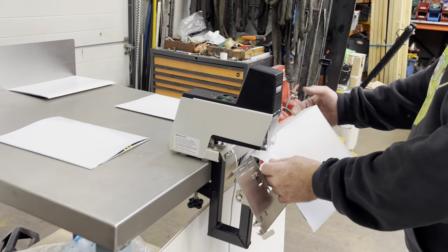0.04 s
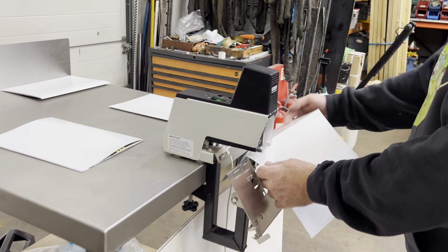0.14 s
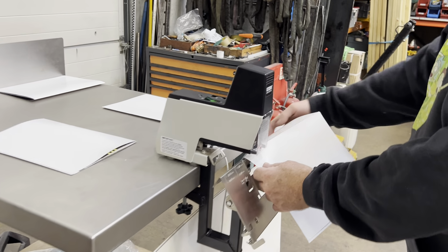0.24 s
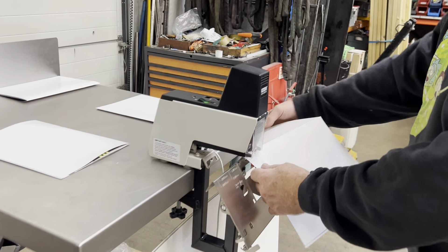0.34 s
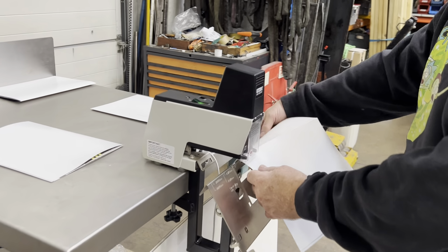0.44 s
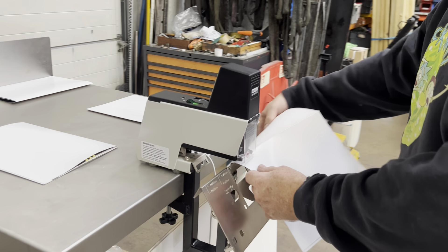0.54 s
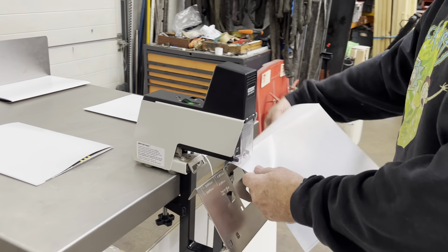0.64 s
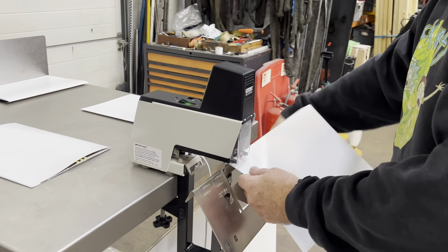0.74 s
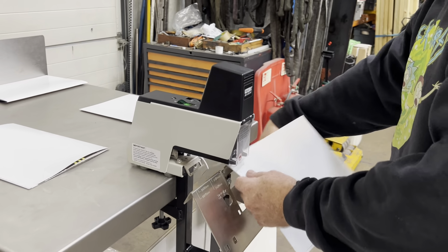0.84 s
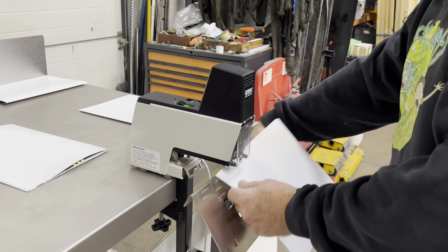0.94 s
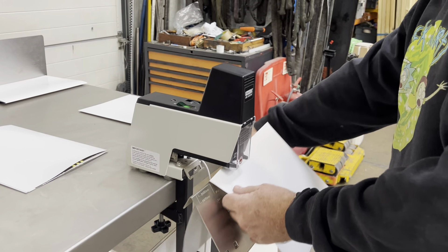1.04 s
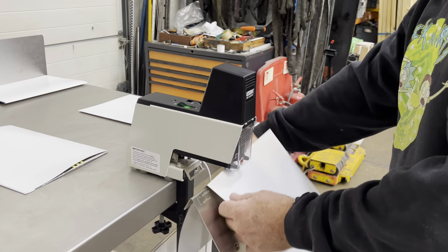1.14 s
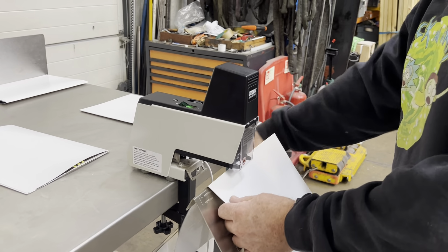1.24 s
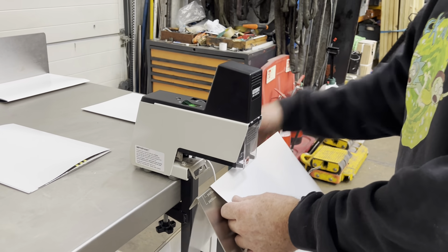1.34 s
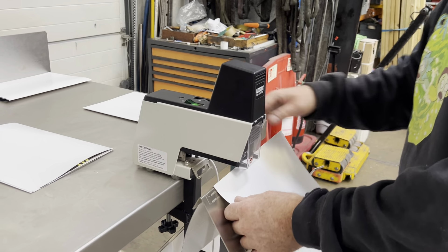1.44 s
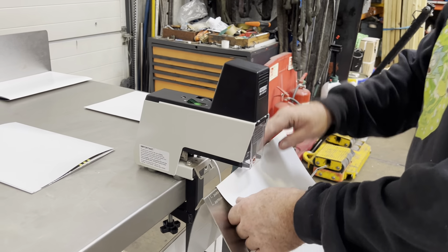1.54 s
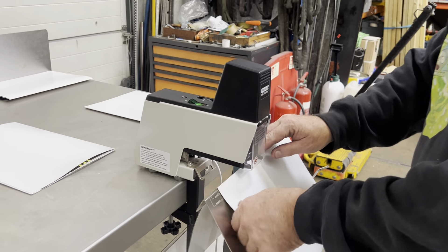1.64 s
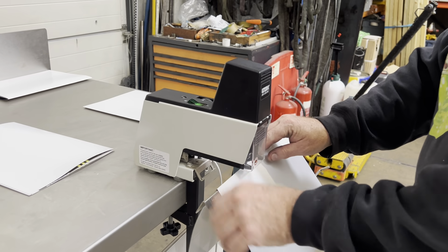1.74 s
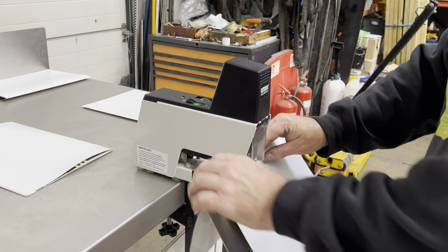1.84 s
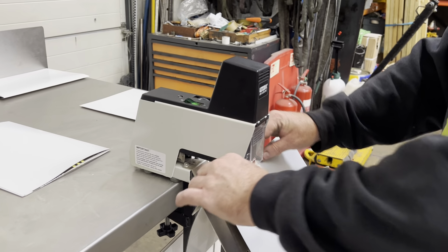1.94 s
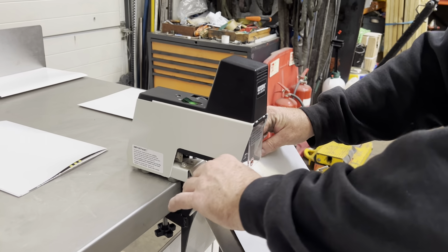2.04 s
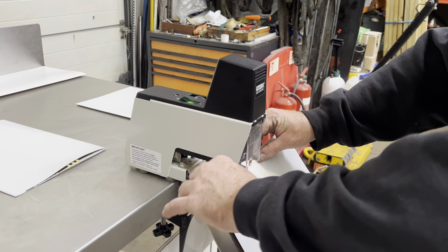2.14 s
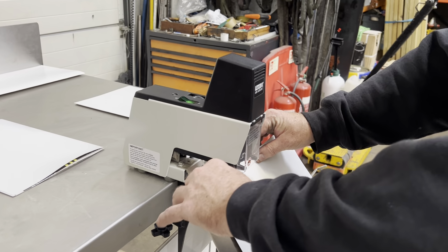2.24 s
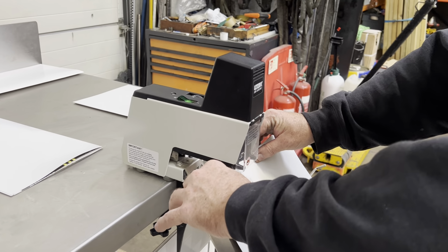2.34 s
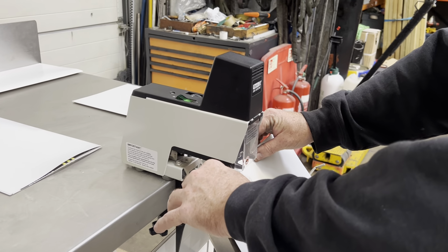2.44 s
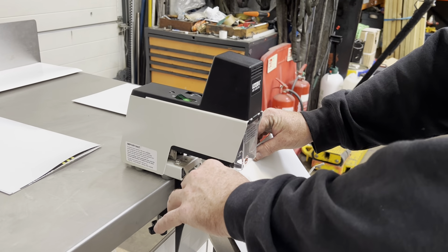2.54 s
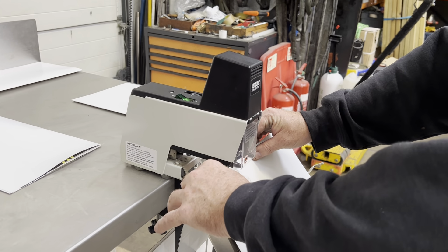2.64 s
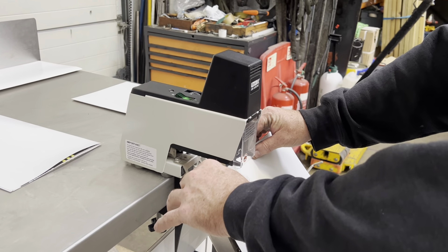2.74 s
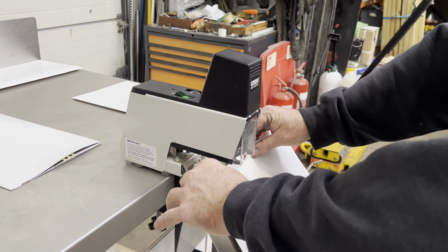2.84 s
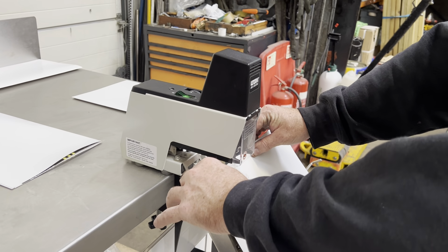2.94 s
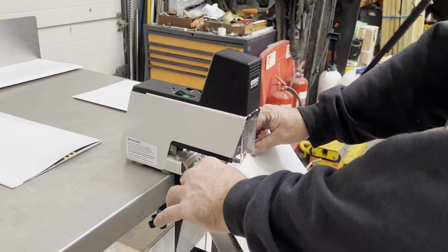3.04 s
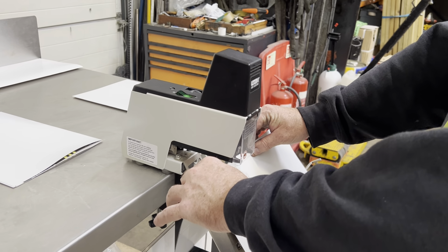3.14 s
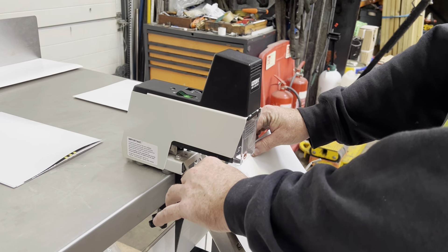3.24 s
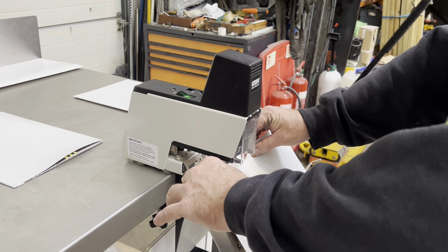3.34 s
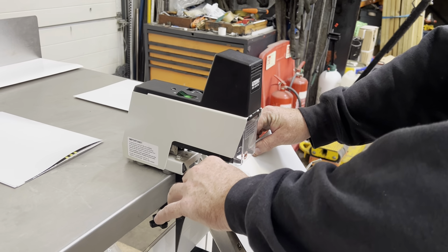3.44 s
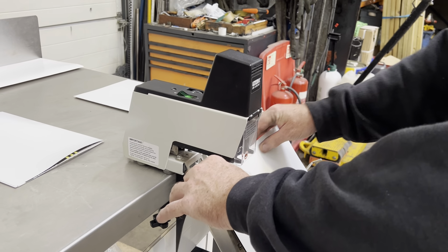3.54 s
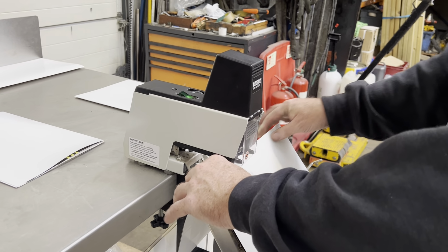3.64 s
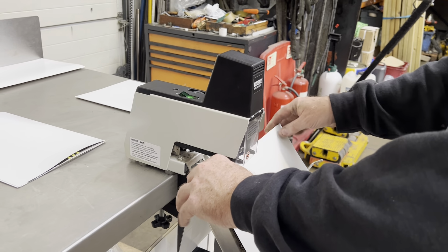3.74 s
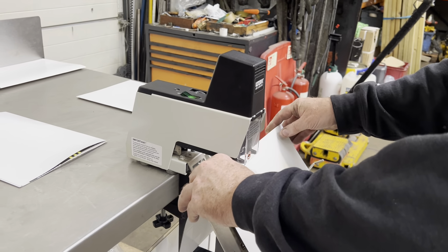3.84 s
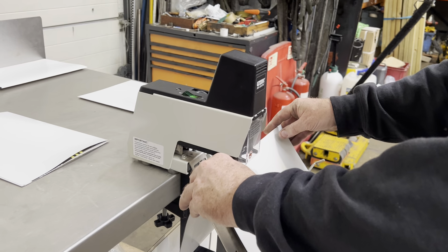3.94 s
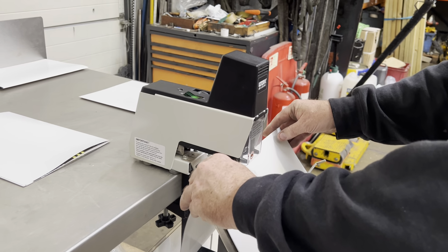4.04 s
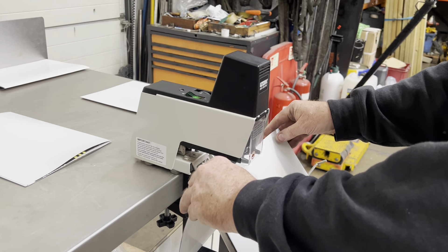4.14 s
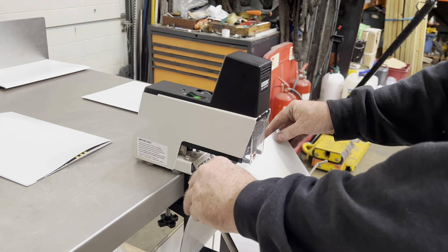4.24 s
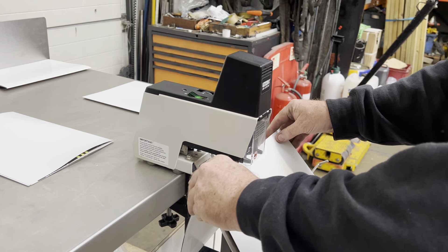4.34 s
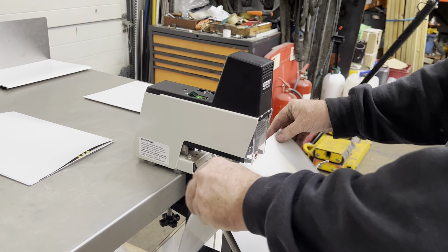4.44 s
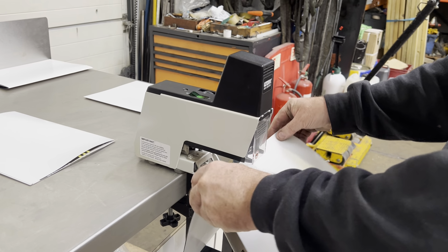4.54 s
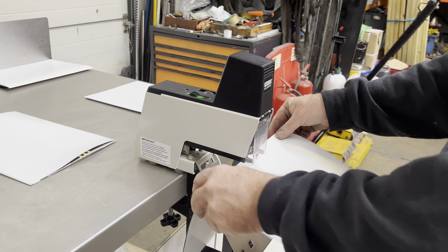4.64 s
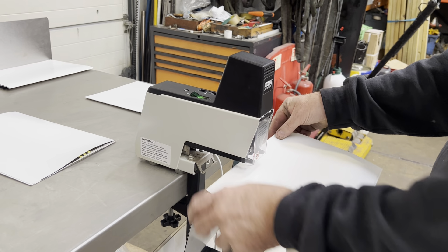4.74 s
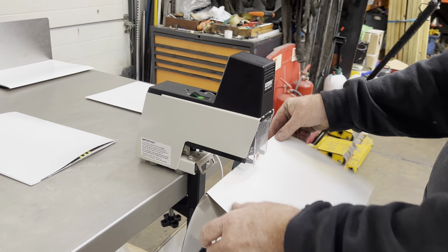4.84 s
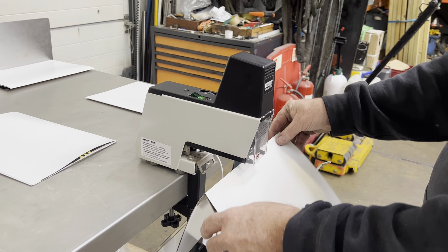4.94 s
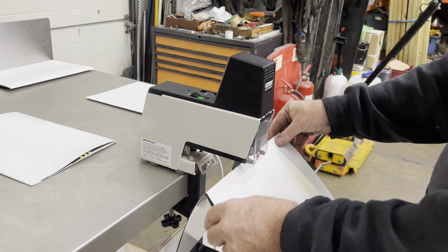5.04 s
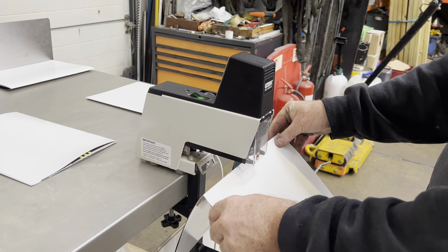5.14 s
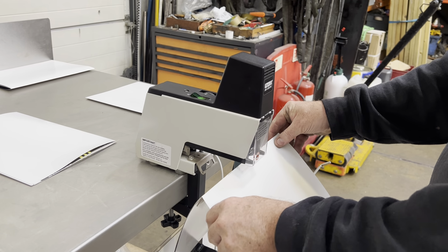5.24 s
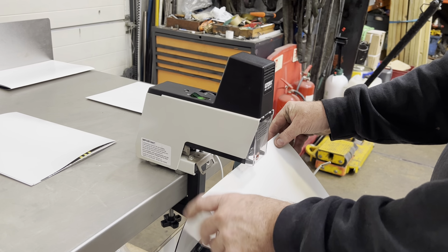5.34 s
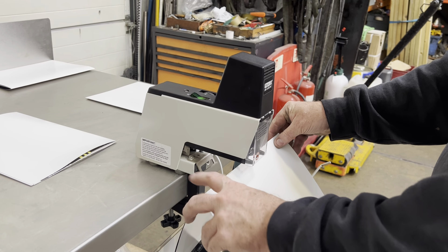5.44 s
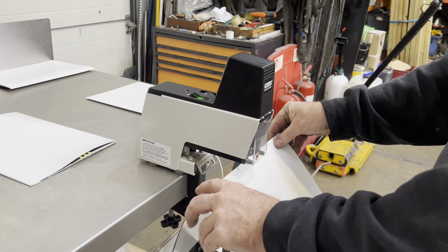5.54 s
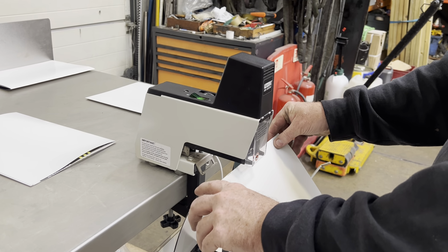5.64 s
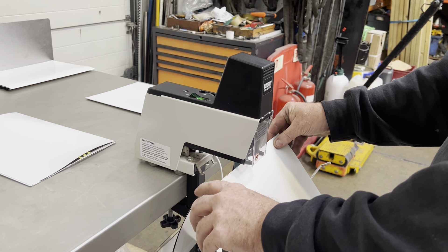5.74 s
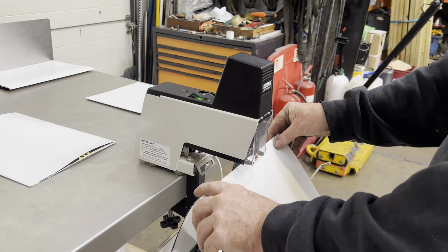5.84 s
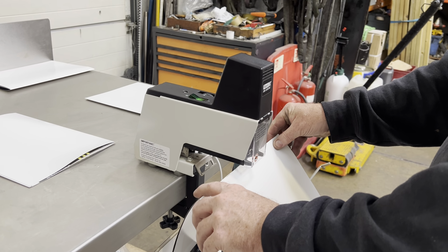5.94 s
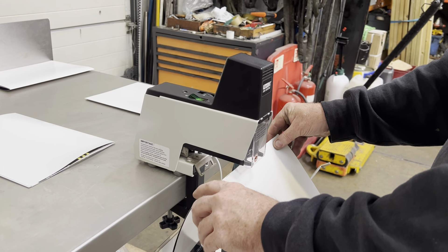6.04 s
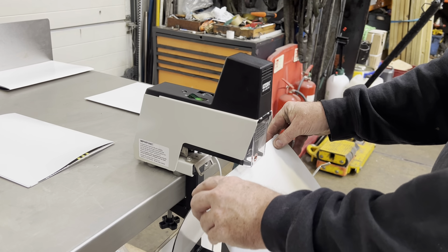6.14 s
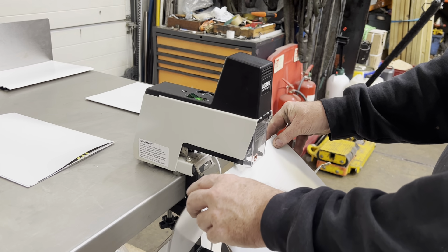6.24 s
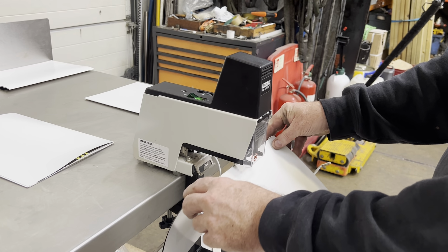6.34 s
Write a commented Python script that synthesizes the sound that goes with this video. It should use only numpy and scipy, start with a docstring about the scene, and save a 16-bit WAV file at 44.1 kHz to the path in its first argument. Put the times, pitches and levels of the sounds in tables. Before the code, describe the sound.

In an echoing workshop with faint ventilation, paper rustles and buckles, a pedal clicks, and two sharp stapler bangs fire about 2.7 seconds apart.

```python
"""Throughout, the rumble and whirr of distant ventilation, as filtered noise, fill a large hard-walled workshop.
From the start, hands shift stiff paper on a saddle: clicking noise hisses in slides, snaps and flops.
A pedal clicks as a crack and a hollow note; then an electric stapler clamped to a steel bench fires, twice in all.
In each stroke the magnet throws the driver, the staple shears and clinches, and parts rattle: sprays of contacts.
Resonant modes ring the head and bench, noise tails give the echo, and a phone a metre away picks it all up."""
import sys
import numpy as np
from scipy import signal
from scipy.fft import rfft, irfft, next_fast_len
from scipy.io import wavfile
from scipy.ndimage import uniform_filter1d

SR = 44100
rng = np.random.default_rng(int(sys.argv[2]) if len(sys.argv) > 2 else 0)


def inscribe(sig):
    """Save sig as 16-bit PCM at rate SR to the path in sys.argv[1].

    A 1-D sig is mono; a 2-D sig holds one channel per row.
    Samples are clipped to [-1, 1] before scaling.
    """
    pcm = np.round(np.clip(np.atleast_2d(sig).T, -1, 1) * 32767)
    wavfile.write(sys.argv[1], SR, pcm.astype(np.int16))


def boost(x):
    """Linear amplitude factor 10**(x/20) for a level x in decibels (scalar or array-like)."""
    u = np.asarray(x, float) / 20
    return 10 ** u


N = 281358
T = np.arange(N) / SR  # time, s

# Swell and sink of the distant air noise. Each row: time in seconds, rumble in dB, whirr in dB.
DRAUGHT = [(0, -46, -55.5), (.6, -45, -52.5), (1.1, -48, -55), (2.1, -47.5, -56), (3, -50.5, -57),
           (4.398, -50.5, -58), (5.6, -50.5, -58.5)]
# Spectral shape of the air noise. Each row: frequency in Hz, relative density in dB per Hz.
AIR_SPECTRUM = [(15, -49.5), (25, -15), (58, 0), (132, -12.5), (286, -18.5), (392, -25.5), (421, -24),
                (751, -26.5), (1050, -19), (1440, -22), (1670, -35), (2390, -43.5), (8000, -64),
                (10400, -102.5), (17600, -120)]
# Reverberation of the workshop. Each row: frequency in Hz, t60 in seconds.
ROOM_DECAY = [(100, 2.9), (500, 1.5), (1000, 1.96), (2000, 1.94), (5000, 1.51), (9000, 0.83), (14000, 0.19)]
# Modes of the bench top. Each row: frequency in Hz, relative level in dB, t60 in seconds.
BENCH_MODES = [(85.4, -36, 1.8), (119, -35, 3.3), (190.4, -34.5, 1.6), (267, -33, 1.8), (316.5, -39, 1.),
               (365, -45.5, 2.4), (410, -40, 2), (433, -43.5, 0.98), (510, -43, 0.63), (714, -45, 1.1),
               (885, -52.5, 0.53)]
# Modes of the steel head and saddle. Each row: frequency in Hz, relative level in dB, t60 in seconds.
HEAD_MODES = [(440, -4, .03), (800, -4, .025), (958, 0, .035), (1250, -5, .02), (1790, -5, .016),
              (2310, -5, .015), (2900, -2, .015), (3300, -4, .013)]

# Resonances of a bending sheet. Each row: centre in Hz, width in Hz, relative level in dB.
SHEET_BANDS = [(1500, 2300, 15.5), (2970, 770, -11), (4000, 990, -3)]
# Spectrum of the crisp part of the paper noise. Each row: frequency in Hz, gain in dB.
CRISP_SPECTRUM = [(4000, -25.0), (5500, -4), (9000, -1.0), (11000, -6), (16000, -9.5)]
# A hand drags paper along. Each row: start in seconds, length in seconds, level in dB, crispness in dB.
SLIDES = [(0, 0.021, -56, -2), (.025, .02, -55, -6), (0.098, .03, -55, -4.5), (0.163, .08, -67.5, 1),
          (0.302, .07, -55.5, -7.5), (0.416, .05, -54, -8), (.52, .03, -63, -7), (0.577, .05, -52.5, -10.5),
          (0.687, .02, -42.5, -12.5), (.765, .02, -57, -8), (0.802, .03, -55, -12),
          (0.876, .085, -48.5, -6.5), (1.007, .04, -70, 0.5), (1.322, .04, -79.5, 4), (1.515, .03, -68, -4),
          (1.61, .1, -63.5, -2), (2.232, .08, -64.5, -6.5), (2.676, .07, -65, -8.5), (2.8, .2, -75.5, -15),
          (4.02, .08, -69, -2.5), (4.386, .03, -84, -11), (4.538, .05, -73, -3), (4.828, .04, -70.5, -1),
          (4.94, .05, -77.5, -4), (5.132, .05, -88, -10), (5.3, .04, -91.5, -8), (5.555, .14, -66.5, -21)]
RESTING_DB = -84  # faint rustle of the held sheaf
SLIDE_RISE_S, SLIDE_T60_S, SLIDE_SLOWER = 0.017, .1, 1.5  # longer drags fade more slowly, s per s of length
# A sheet buckles with a snap. Each row: start in seconds, level in dB, centre in Hz.
SNAPS = [(0.374, -43, 1880), (0.445, -47, 7000), (.515, -45.5, 7500), (.642, -45, 7400),
         (.651, -48.5, 7400), (.7215, -27.5, 2190), (.728, -27.5, 1790), (0.753, -35.5, 2780),
         (0.969, -50, 10920), (1.199, -41.5, 4260), (1.213, -45.5, 3500), (1.225, -51.5, 4000),
         (1.286, -65, 11000), (1.638, -61, 7500), (1.745, -66, 6000), (1.94, -58, 6100), (3.322, -45, 9150),
         (4.004, -55.5, 7000), (4.594, -63, 3034), (4.795, -69, 6000), (4.912, -63, 9000),
         (5.513, -57.5, 6000)]
SNAP_RISE_S, SNAP_T60_S = 0.0023, 0.017
# The sheaf flops on the saddle. Each row: start in seconds, level in dB, centre in Hz, t60 in seconds.
FLOPS = [(.028, -49, 560, 0.21), (.38, -44.5, 497, .3), (.434, -39, 600, 0.13), (.452, -38, 350, 0.13),
         (.972, -37, 300, 0.14), (.99, -40, 231, 0.17), (1.209, -44, 290, 0.13), (1.396, -42.5, 286.7, .12),
         (2.11, -52, 800, .04), (4.593, -47, 1000, 0.057), (4.603, -41, 350, 0.073),
         (4.791, -47.5, 340, 0.097), (5.511, -46.5, 443, 0.066)]
FLOP_RISE_S = 0.0058
SNAP_WIDTH, FLOP_WIDTH = 1.7, 1.4  # band width over centre
SNAP_SPREAD_DB, FLOP_SPREAD_DB = 2.8, .8  # unevenness of the clicks
# The sheaf bumps the steel saddle. Each row: start in seconds, level in dB.
BUMPS = [(.7225, -41), (1.1, -48), (3.6, -62), (0.4, -60)]

# Pedal and fingers knock plastic and steel.
# Each row: start in seconds, crack in dB, ring in dB, ring frequency in Hz, ring t60 in seconds.
KNOCKS = [(2.196, -53, -27.5, 650, 0.0061), (3.0165, -40, -49, 600, 0.04), (3.0630, -15.5, -37, 1980, 0.07),
          (3.0674, -20.5, -20.5, 558, 0.036), (4.3595, -62, -52.5, 2340, 0.02),
          (4.597, -62, -66, 4750, 0.11), (4.604, -75, -62.5, 2680, 0.067), (5.553, -39, -30, 592.4, 0.062),
          (5.616, -60, -39.5, 632, 0.062), (5.684, -61, -61, 4240, 0.043), (5.747, -15.5, -20, 573, 0.027),
          (5.7461, -26.5, -25, 2270, 0.012), (5.779, -48, -26.5, 544, .02)]
# Spectrum of the crack of a knock. Each row: frequency in Hz, gain in dB.
LATCH_SPECTRUM = [(600, -4.5), (2100, 2.5), (3200, -6), (4300, 0), (6000, -12.5), (7800, -2.5),
                  (12000, -16.5), (16000, -13.5)]

# The magnet pulls in. Each row: start in seconds, strength in dB.
SHOTS = [(3.1200, 0), (5.8000, 0.5)]
# Stages of one stroke: plunger slides, driver shears the staple off, legs pierce the paper,
# plunger bottoms out, driver strikes the anvil, legs clinch on the anvil,
# loose parts rattle, head rebounds, housing rocks on its clamp.
# Each row: delay in seconds, level in dB, rise in seconds, t60 in seconds, lowest Hz, highest Hz.
STROKE = [(.0003, -20, 0.0065, .04, 703, 3377), (.0110, -11.5, 0.0015, .03, 1500, 15130),
          (0.0126, -9.5, 0.0046, .04, 600, 2500), (0.02, -13.5, 0.0019, 0.063, 705.4, 3530),
          (0.021, -9, 0.00065, 0.013, 800, 4000), (0.0223, -6.5, 0.0013, .03, 3000, 15000),
          (.0260, -15, .012, .14, 500, 6000), (.0320, -18, .008, 0.072, 380, 1100),
          (.0480, -20.5, 0.011, 0.16, 280, 1000)]
# Spectrum of the machine's clack. Each row: frequency in Hz, gain in dB.
CLACK_SPECTRUM = [(40, -19.5), (100, 7.5), (160, 2.5), (300, 2), (900, 1), (3000, -1.5), (3700, -1.5),
                  (6000, -8), (9000, -4), (12000, -9.5), (16000, -11)]

# Stereo pick-up of the phone. Each row: frequency in Hz, sideways pick-up in dB, left minus right in dB.
PORTS = [(60, -19, .5), (300, -11, 1), (700, -6, 1), (1000, -1.5, 1), (1400, 2.5, -1), (2000, -7, 1.5),
         (2500, -6, 1), (3000, -5, 2), (4500, -3, 4), (6000, -3, 2)]
SHARED_HZ, SHARED_LAG_S = 6600, .000153  # above this both sides share one port; lag of the left
TOP_HZ = 16000  # nothing is picked up from here on


def across(table, hz, axis=1):
    """Interpolation: a table column is read on a log-frequency axis."""
    return np.interp(np.log(hz + 1), np.log([row[0] for row in table]), [row[axis] for row in table])


def colour(x, table):
    """Linear filtering: each frequency is scaled by the gain in a (Hz, dB) table."""
    size = next_fast_len(x.shape[-1])
    gain = boost(across(table, np.fft.rfftfreq(size, 1 / SR)))
    return irfft(rfft(x, size) * gain, size)[..., :x.shape[-1]]


def unit(x):
    """Normalization: the signal is scaled to rms 1."""
    return x / np.sqrt(np.mean(x ** 2))


def band(x, hz, width):
    """Resonance: a two-pole filter with gain 1 at its centre."""
    return signal.lfilter(*signal.iirpeak(min(hz, .45 * SR), hz / width, SR), x)


def ring(x, modes):
    """Modal superposition: a force drives a set of exponentially decaying modes."""
    out = 0
    for hz, db, t60 in modes:
        radius = np.exp(-np.log(1000) / (t60 * SR))  # decay per sample
        w = 2 * np.pi * hz / SR
        mode = signal.lfilter([0, 1], [1, -2 * radius * np.cos(w), radius * radius], x)
        out = out + boost(db) * np.sin(w) * mode
    return out


def add(out, s, x):
    """Superposition: x is mixed into out at time s."""
    i = int(s * SR)
    out[..., i:i + x.shape[-1]] += x[..., :N - i]


def grit(size, spread_db):
    """Random excitation: two unrelated streams of clicks of uneven size."""
    click_db = spread_db * np.minimum(rng.standard_exponential(size), 6)
    return unit(rng.standard_normal((2, size)) * boost(click_db))


def burst(rise, t60, size=8000):
    """Transient envelope: a swell for rise seconds, then exponential decay."""
    t = np.arange(size) / SR
    return np.minimum(t / rise, 1) ** 2 * boost(-60 * np.maximum(t - rise, 0) / t60)


def walk(rate):
    """Slow random fluctuation: levels held for 1 / rate seconds are smoothed twice."""
    k = int(SR / rate)
    held = np.repeat(rng.standard_normal(N // k + 1), k)
    return 1.3 * uniform_filter1d(uniform_filter1d(held, k), k)[:N]


def ventilation():
    """Broadband flow noise: a wavering rumble below, a steadier whirr above."""
    s, rumble_db, whirr_db = np.array(DRAUGHT).T
    air = colour(rng.standard_normal((2, N)), AIR_SPECTRUM)
    rumble = signal.sosfiltfilt(signal.butter(2, 350, fs=SR, output="sos"), air)
    whirr = air - rumble
    rumble_level = boost(np.interp(T, s, rumble_db) + 1.1 * walk(4.2))
    whirr_level = boost(np.interp(T, s, whirr_db))
    return rumble_level * unit(rumble) + whirr_level * unit(whirr)


def workshop(x):
    """Diffuse reverberation: each band dies at its own rate; front and side sound take other paths."""
    t = T[:int(1.8 * SR)]
    tails = 0
    for hz in 80 * 2 ** np.arange(0, 7.6, .5):  # half-octave centres
        noise = band(rng.standard_normal((2, 2, len(t))), hz, hz / 2)
        tails = tails + noise * boost(-60 * t / across(ROOM_DECAY, hz))
    tails = tails * np.minimum(t / 0.0067, 1)  # the echo builds up
    return signal.fftconvolve(x[None], tails, axes=2).sum(axis=1)[:, :N]


def bench():
    """Impulsive excitation of modes: the recoil of each shot thumps the bench top."""
    recoil = np.zeros(N)
    push = np.hanning(30) / np.hanning(30).sum()
    for s, shot_db in SHOTS:
        add(recoil, s + 0.04, boost(shot_db) * push)
    return ring(recoil, BENCH_MODES) * boost(np.array([[3], [0]]))  # front, sideways


def sliding_paper():
    """Friction noise: fibres catching at random excite the bending sheet, which hisses and crackles."""
    fibres = grit(size=N, spread_db=3.2) * boost(2.2 * walk(90) + 1.5 * walk(25))
    body = 0
    for hz, width, db in SHEET_BANDS:
        body = body + boost(db) * band(band(fibres, hz, width), hz, 2 * width)
    body = unit(body)
    crisp = unit(colour(fibres, CRISP_SPECTRUM))
    out = boost(RESTING_DB) * (body + crisp)
    for s, length, db, crisp_db in SLIDES:
        rise = np.clip((T - s) / SLIDE_RISE_S, 0, 1) ** 2
        t60 = SLIDE_T60_S + SLIDE_SLOWER * length
        fade = boost(-60 * np.maximum(T - s - SLIDE_RISE_S - length, 0) / t60)
        out = out + boost(db) * rise * fade * (body + boost(crisp_db) * crisp)
    return out


def snaps_and_flops():
    """Sudden release: the sheaf snaps when it buckles and flops when it lands, as bursts of banded clicks."""
    out = np.zeros((2, N))
    snaps = [(s, db, hz, SNAP_RISE_S, SNAP_T60_S, SNAP_WIDTH, SNAP_SPREAD_DB) for s, db, hz in SNAPS]
    flops = [(s, db, hz, FLOP_RISE_S, t60, FLOP_WIDTH, FLOP_SPREAD_DB) for s, db, hz, t60 in FLOPS]
    for s, db, hz, rise, t60, width, spread_db in snaps + flops:
        clicks = grit(size=8000, spread_db=spread_db)
        crackle = band(band(clicks, hz, width * hz), hz, width * hz)
        add(out, s, boost(db) * unit(crackle) * burst(rise, t60))
    return out


def saddle_bumps():
    """Modal response to impact: short bumps of the sheaf ring the steel saddle."""
    force = np.zeros((2, N))
    for s, db in BUMPS:
        add(force, s, boost(db) * grit(size=400, spread_db=2.) * burst(.0004, .002, size=400))
    return ring(force, HEAD_MODES)


def knocks():
    """Impact and resonance: each knock gives a short crack and one hollow, unsteady note."""
    out = np.zeros((2, N))
    for s, crack_db, ring_db, hz, t60 in KNOCKS:
        crack = colour(grit(size=8000, spread_db=1.) * burst(.0006, .016), LATCH_SPECTRUM)
        phase = 2 * np.pi * hz * T[:8000] + .8 * walk(400)[:8000]
        note = np.sin(phase) * burst(.002, t60)
        add(out, s, boost(crack_db) * crack + boost(ring_db) * note)
    return out


def stapler():
    """Impact excitation: each stage of a stroke is a spray of metal contacts that rings the head."""
    force = np.zeros((2, N))
    for s, shot_db in SHOTS:
        for delay, db, rise, t60, low_hz, high_hz in STROKE:
            edges = [low_hz, min(high_hz, .45 * SR)]
            spray = grit(size=12000, spread_db=2.4) * boost(1.8 * walk(250)[:12000])
            contacts = signal.lfilter(*signal.butter(1, edges, "band", fs=SR), spray)
            stage = unit(contacts) * burst(rise, t60, size=12000)
            add(force, s + delay, boost(shot_db + db) * stage)
    head = boost(-38) * ring(force, HEAD_MODES)
    return colour(force + head, CLACK_SPECTRUM)


def scene():
    """Superposition: row 0 is what reaches the phone from the front, row 1 what reaches it sideways."""
    machine = stapler()
    hands = knocks() + saddle_bumps() + sliding_paper() + snaps_and_flops()
    facing = boost(np.array([[0], [-4]]))
    # the bang fills the whole room; paper mostly faces the phone
    echo = workshop(boost(-51) * machine + boost(-53.5) * hands)
    return (machine + hands) * facing + echo + bench() + ventilation()


def roll_off(x):
    """The treble ends steeply here."""
    return signal.sosfilt(signal.butter(12, 16530, fs=SR, output="sos"), x)


def record(dry):
    """Sum and difference pick-up: ports form left and right; one port gives the treble, late on the left."""
    size = next_fast_len(N)
    hz = np.fft.rfftfreq(size, 1 / SR)
    front, sideways = rfft(dry, size)
    share = boost(across(PORTS, hz))
    lean = boost(across(PORTS, hz, axis=2) / 2)
    treble = 1 / (1 + (SHARED_HZ / (hz + 1)) ** 20)
    lag = np.exp(-2j * np.pi * hz * SHARED_LAG_S)
    left = (1 - treble) * lean * (front + share * sideways) + treble * front * lag
    right = (1 - treble) / lean * (front - share * sideways) + treble * front
    low_cut = hz ** 2 / (hz ** 2 + 45 ** 2)
    mix = irfft(np.array([left, right]) * (hz < TOP_HZ) * low_cut, size)[:, :N]
    mix = np.tanh(1.053 * mix) / 1.15  # the loudest peaks are rounded off
    return roll_off(mix)


dry = scene()
out = record(dry)
inscribe(out)
```